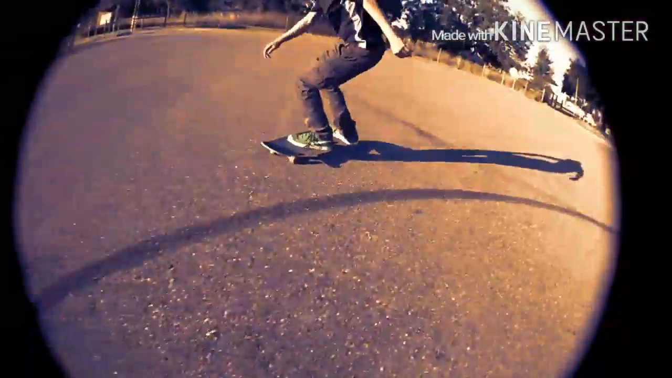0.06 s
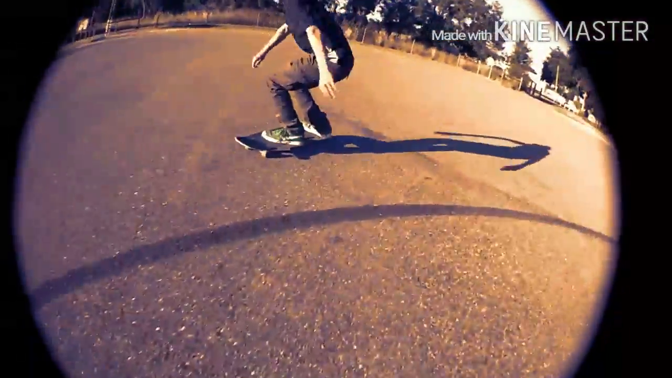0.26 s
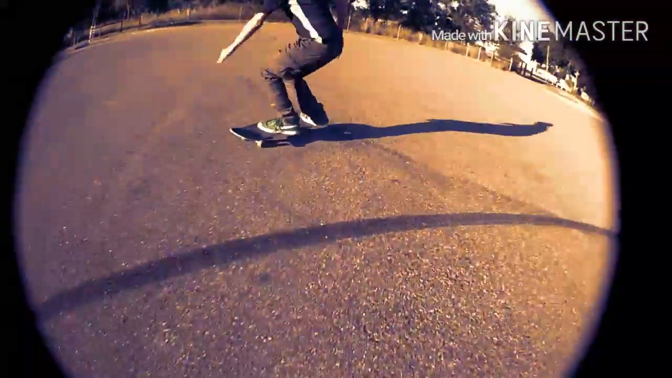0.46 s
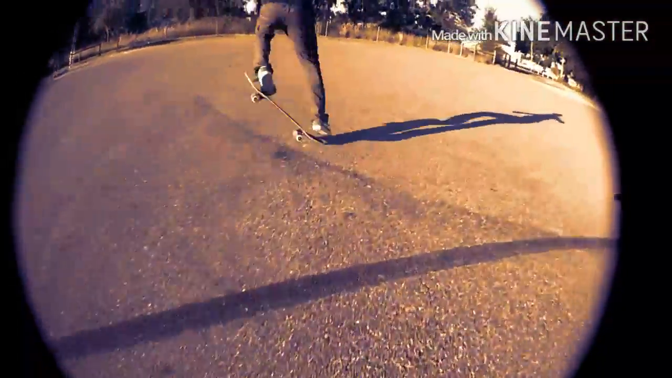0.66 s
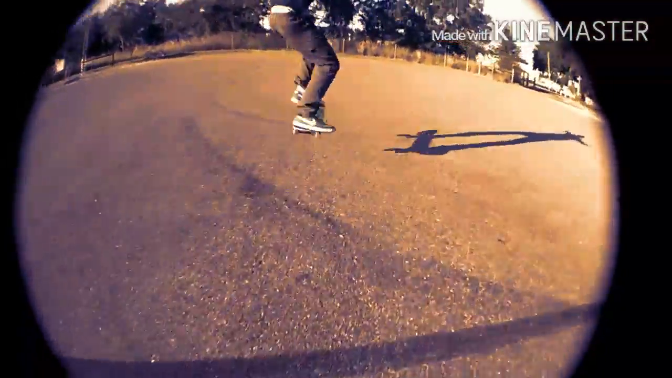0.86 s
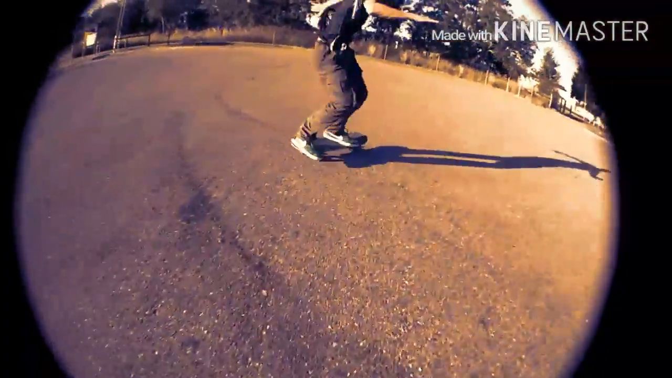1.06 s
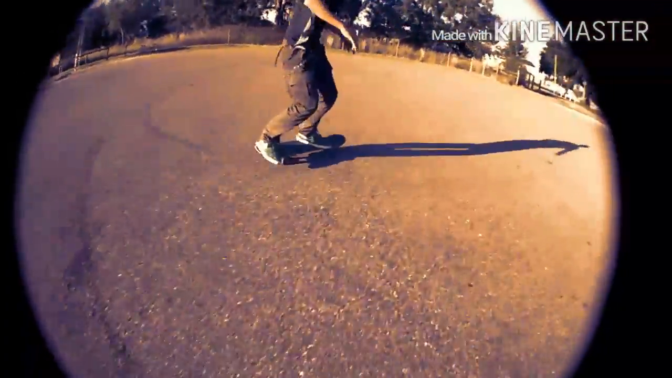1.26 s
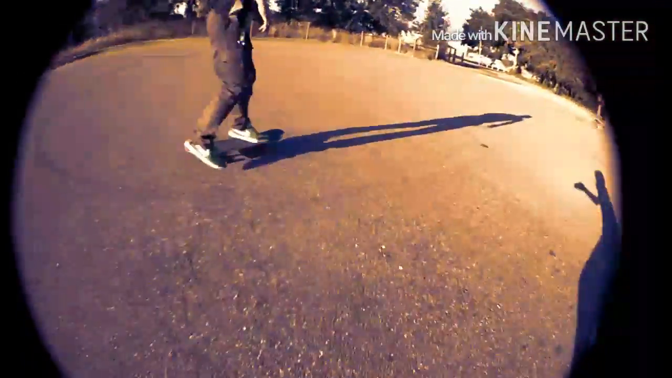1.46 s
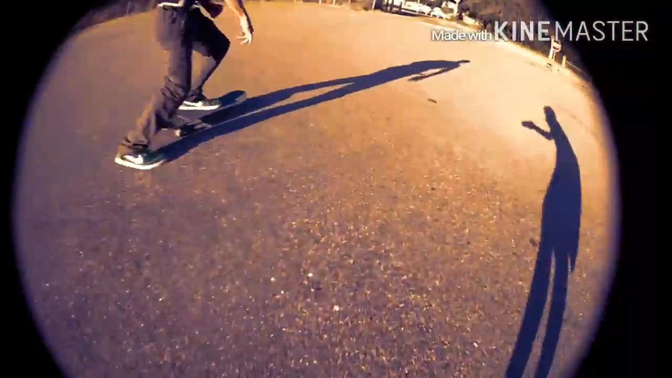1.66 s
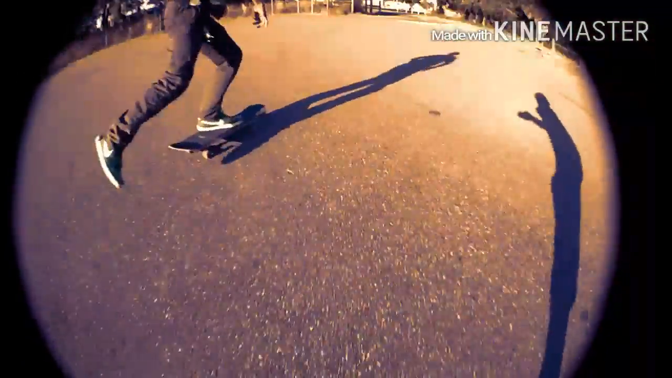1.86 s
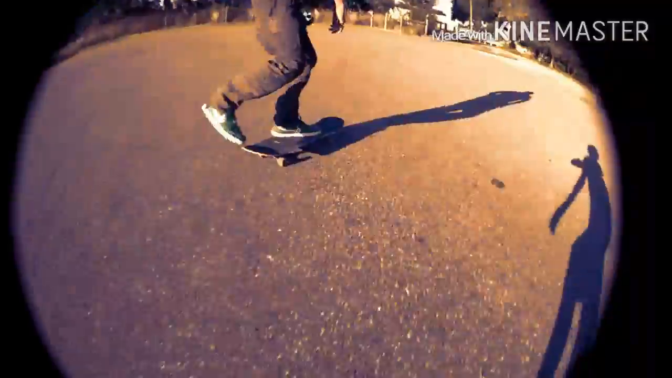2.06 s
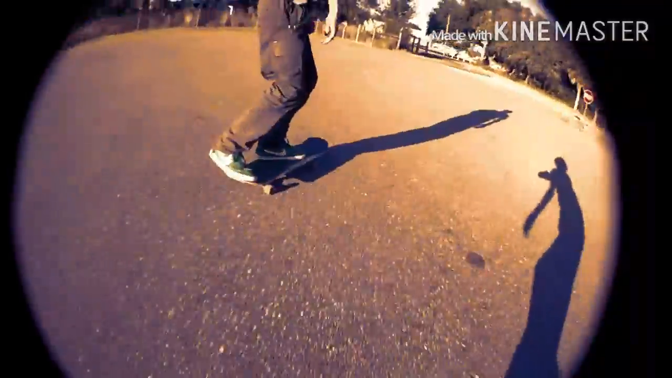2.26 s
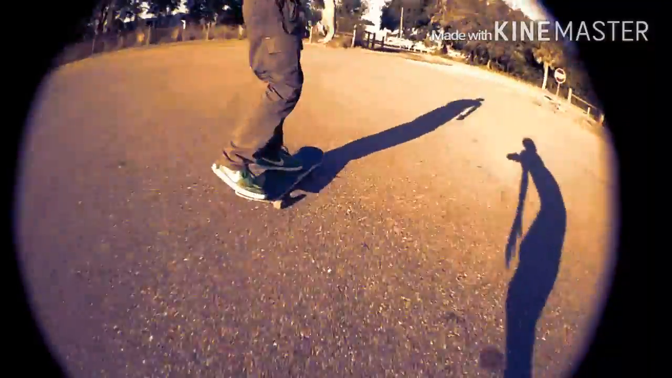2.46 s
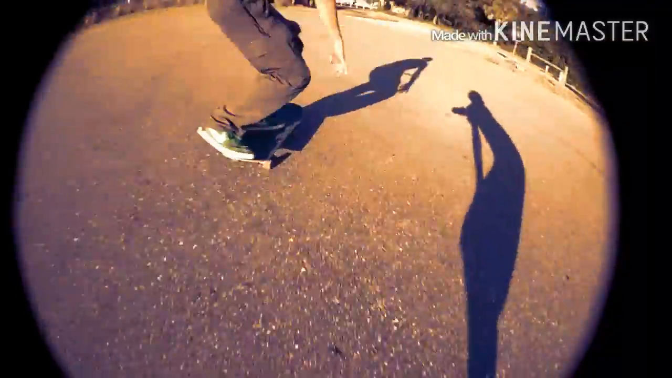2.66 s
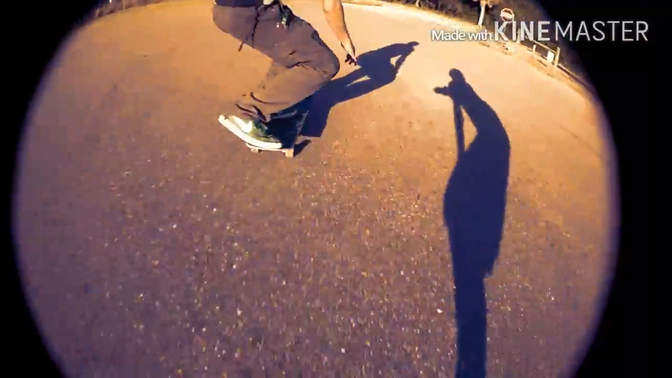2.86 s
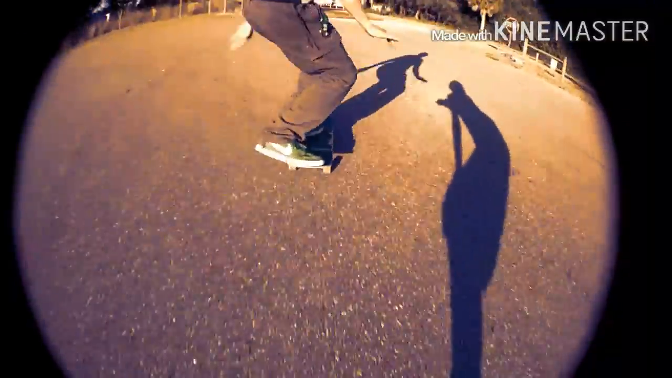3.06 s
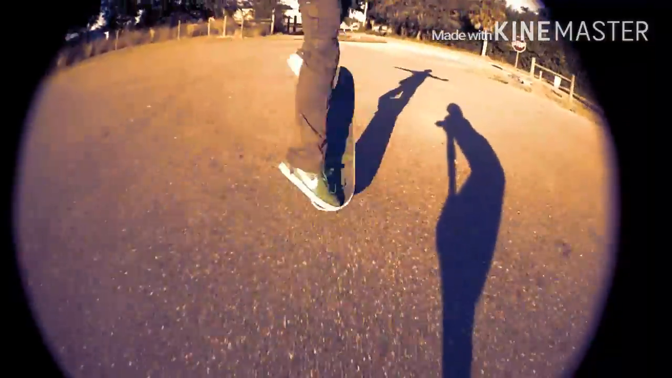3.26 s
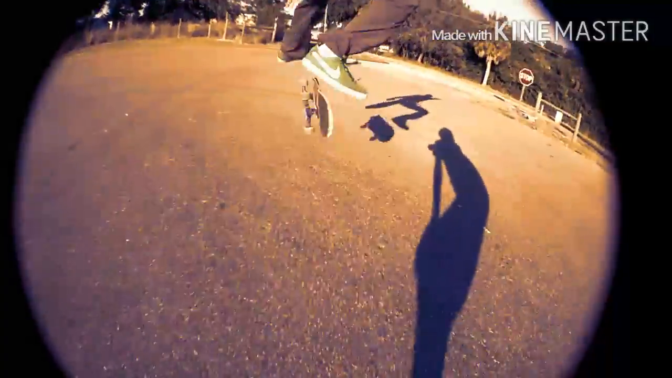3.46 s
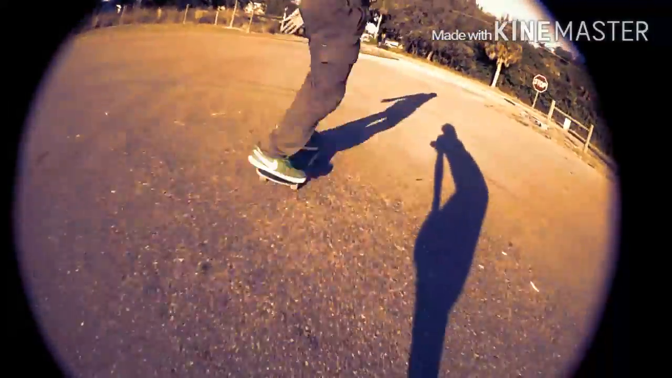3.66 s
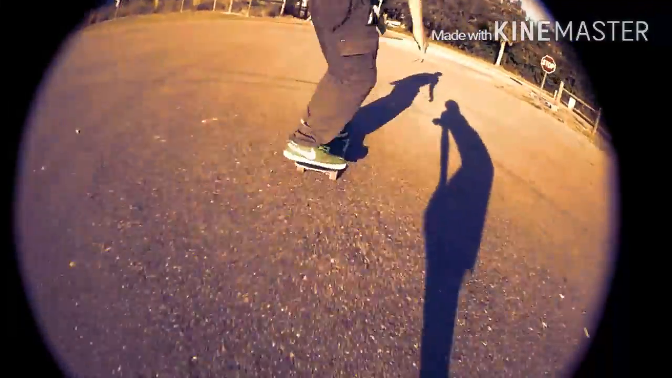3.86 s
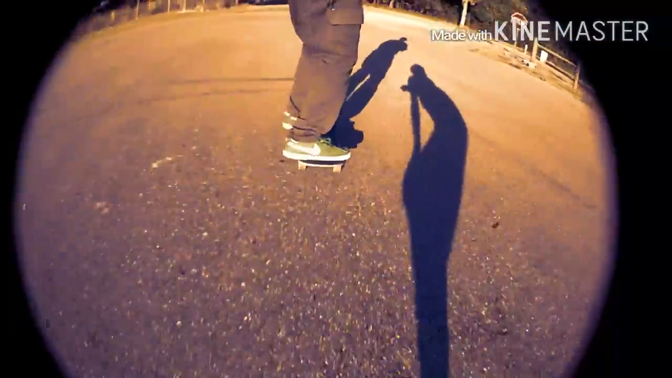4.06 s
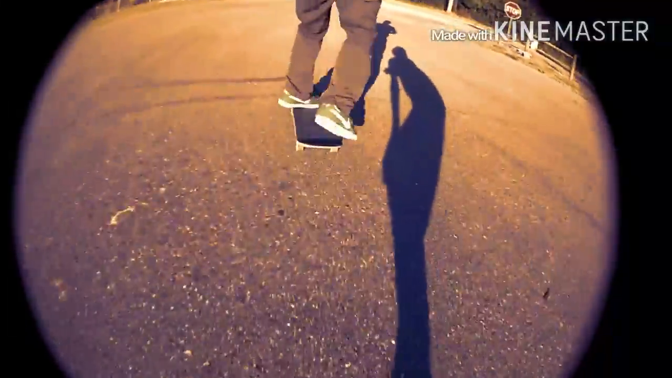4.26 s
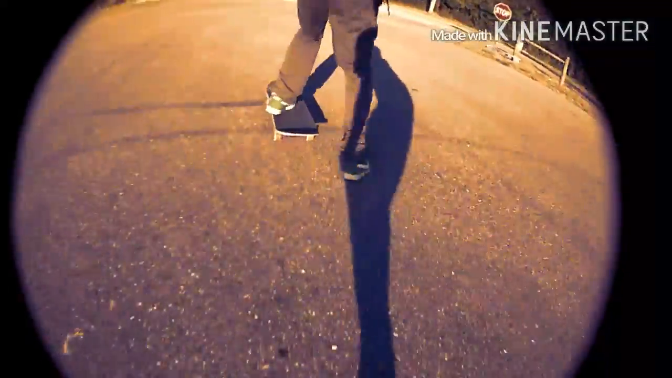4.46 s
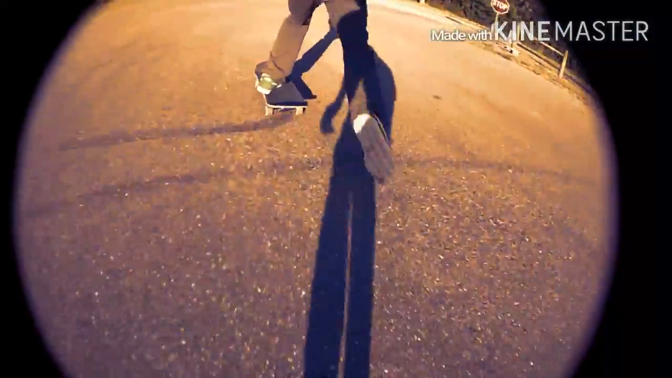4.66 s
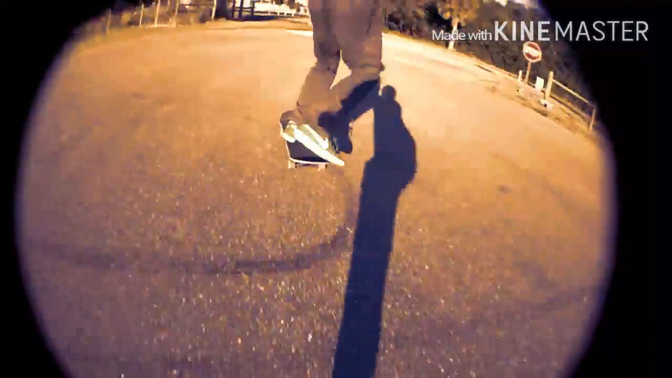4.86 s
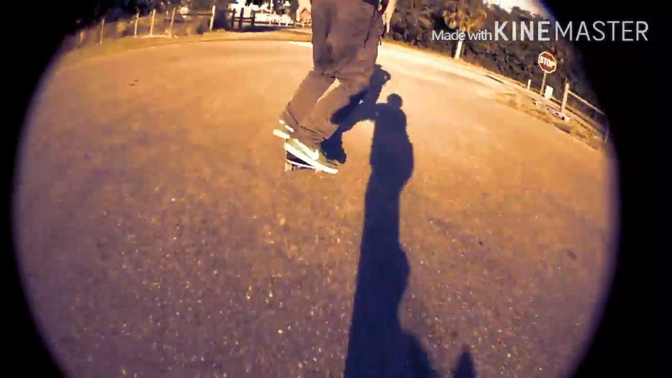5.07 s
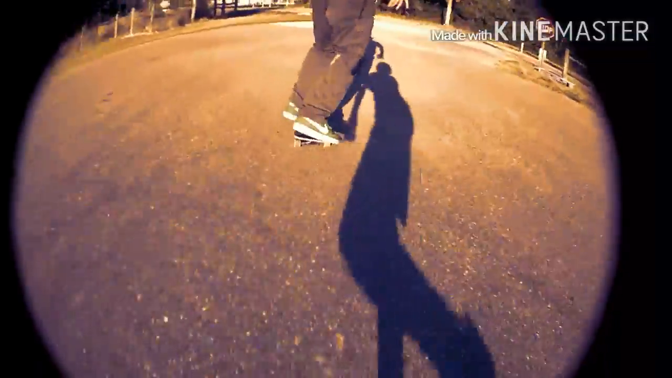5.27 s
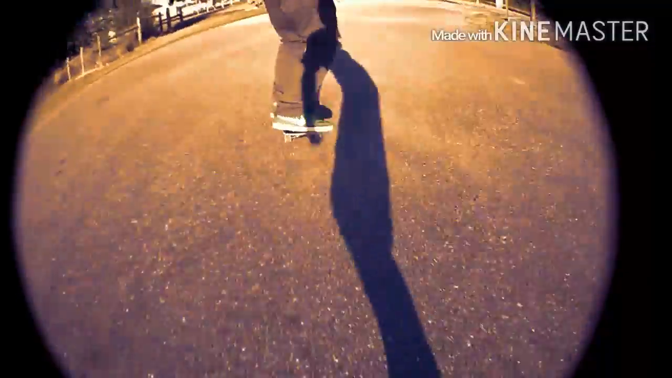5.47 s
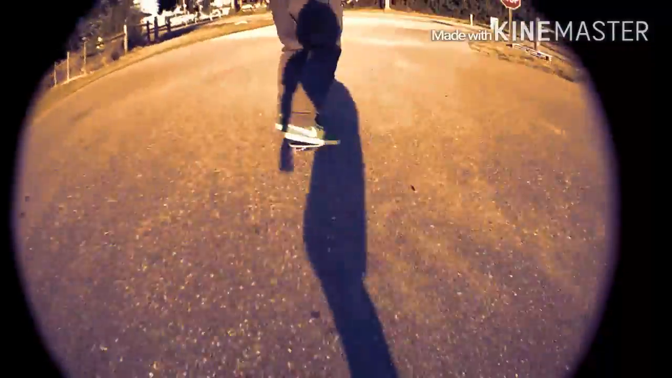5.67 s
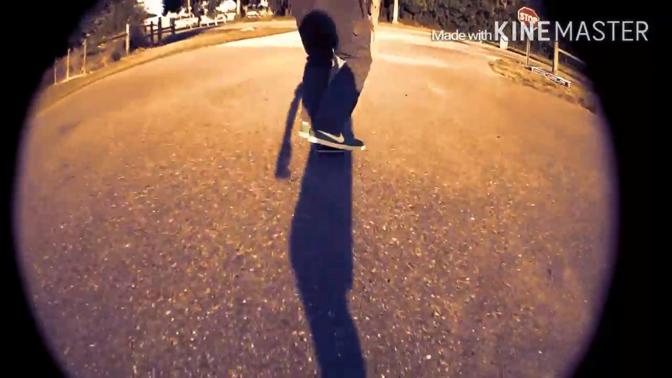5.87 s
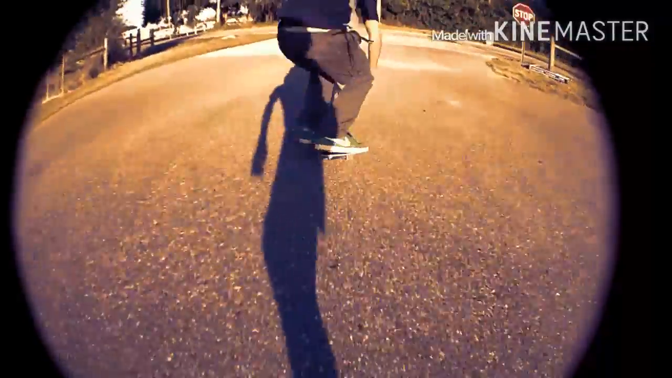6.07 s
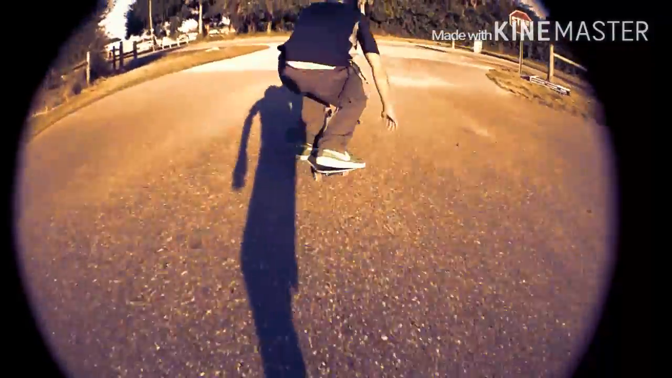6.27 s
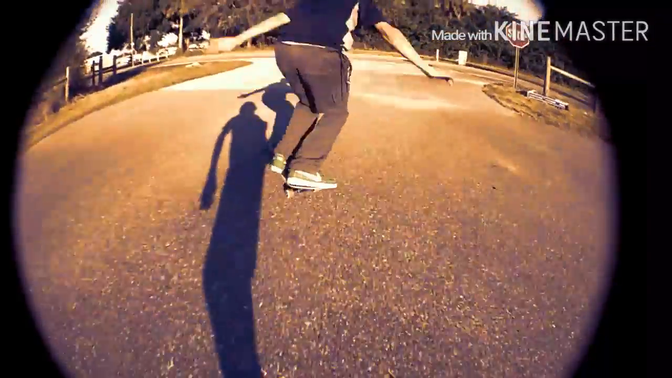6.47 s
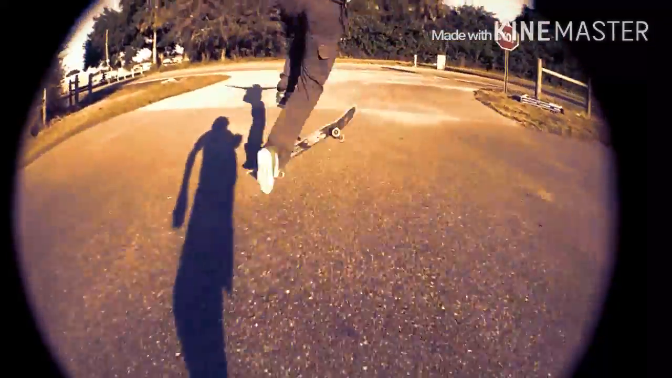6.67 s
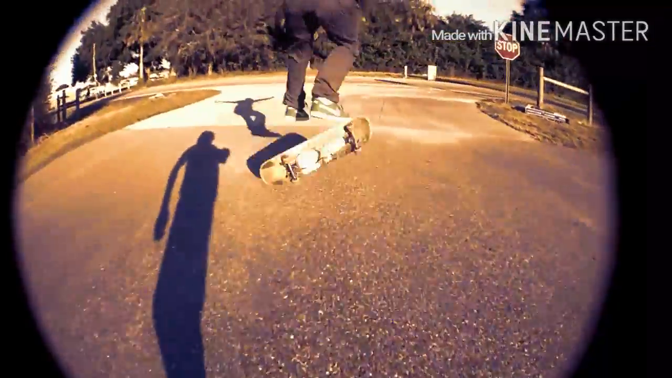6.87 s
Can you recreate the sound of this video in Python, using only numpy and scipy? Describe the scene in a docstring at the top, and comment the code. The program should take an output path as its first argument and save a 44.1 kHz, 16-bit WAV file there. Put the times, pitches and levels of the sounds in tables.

```python
"""A skateboard rolls on coarse asphalt past a first burst of knocks; gusts then blow on two microphones. Shoes
and wheels drag, a second board under the microphones comes up, and tricks bring the hardest blows. Loose trucks
tick as the rolling thins; gusts return, air thumps twice, and a last run of knocks ends it. Stones drive noise
through deck, truck and grit filters throughout, with bright snaps between. Blows ring resonances, the wind
sounds in opposite polarity on the two sides, and the loudest peaks saturate the input."""
import sys
import numpy as np
from scipy import signal
from scipy.fft import rfft, irfft, next_fast_len
from scipy.io import wavfile
from scipy.ndimage import uniform_filter1d, map_coordinates

SR = 44100
rng = np.random.default_rng(int(sys.argv[2]) if len(sys.argv) > 2 else 0)


def wav_out(sig):
    """Save sig, one row per channel (or a flat mono array), as 16-bit PCM at SR to the path in sys.argv[1]."""
    wavfile.write(sys.argv[1], SR, np.round(np.clip(np.atleast_2d(sig).T, -1, 1) * 32767).astype(np.int16))


def linear_from_db(decibels):
    """Turn decibels (scalar or array-like) into linear amplitude factors; 0 gives 1."""
    return 10 ** (np.asarray(decibels, float) / 20)


N = 305172

# rolling of the ridden board, before unloading: time_s, deck_db, brightness_db (trucks and grit)
ROLLING = [(0, -21, -0.5), (.2, -27, 0.5), (.33, -21, 2), (.46, -18.5, -0.5), (1.01, -29.5, 3),
           (1.38, -24, 2.5), (1.46, -19, 0.5), (1.62, -25.5, 3), (1.72, -16, 0), (1.93, -21, 2),
           (2.02, -23.5, 1), (2.9, -19, 1), (2.94, -28, 6), (3.71, -37.5, 3.5), (4.36, -27.5, 3),
           (4.62, -22, 1.5), (4.84, -18, 4.5), (5.09, -22.5, 6), (5.14, -18.5, 5), (5.37, -24, 0.5),
           (5.78, -20.5, 2.5), (6.27, -19.5, 1.5), (6.4, -16.5, -1), (6.92, -36, 1.5)]
# load leaving the wheels and returning evenly: start_s, drop_db, back_after_s
UNLOADINGS = [(0.45, 11, 0.25), (1.636, 7.5, 0.28), (3.025, 6.5, 0.66), (5.78, 7.5, 1), (6.405, 16, 0.32)]
# grit level over what brightness gives: time_s, added_db
GRIT_LIFT = [(0, 7), (.8, 0.5), (1.8, 1), (3.7, -1), (4.7, -1.5), (5.6, 2), (6.92, 3.5)]
# shoes and wheels dragging sideways: start_s, length_s, gain_db
DRAGS = [(2.116, 0.22, -20), (3.286, 0.13, -30.5), (3.68, 0.071, -35), (3.96, 0.33, -32.5),
         (5.45, 0.308, -27), (6.233, 0.084, -21.5), (6.32, 0.098, -23.5)]
# resonances of the wooden deck: centre_hz, width_hz, level_db
DECK_MODES = [(247, 220, -3.5), (520, 172, 2), (664, 135, 4), (903, 202, 1.5), (1285, 320, -4.5)]
# resonances of the trucks: centre_hz, width_hz, level_db
TRUCK_MODES = [(1520, 475, 1), (1800, 620, 3), (2240, 503, -3.5), (3554, 203, -3.5), (4060, 570, -14)]
# spectrum of crushed grit: frequency_hz, density_db (per Hz)
GRIT_SPECTRUM = [(1500, -31), (3600, 9), (5200, -3), (9300, -4.5), (11500, -7.5), (13000, -17),
                 (15300, -21)]
# knocks of tail, wheels and shoes on the deck: start_s, knock_peak_db, crack_peak_db, pitch_hz
BLOWS = [(0.4174, -4, -7.5, 1240), (0.613, -8, -24, 1420), (0.616, -7.5, -25, 1410), (0.63, -9, -10, 800),
         (0.639, -6, -8, 780), (0.717, -3, -5, 2000), (0.733, -5.5, -9, 890), (0.741, -7.5, -16, 1910),
         (0.755, -19, -13, 1800), (0.777, -22, -19, 1700), (1.6987, -8, -20, 990), (1.849, -6, -21, 850),
         (2.968, -9, -28, 1200), (3.0191, -2.5, 2, 990), (3.309, -12.5, -15, 890), (3.317, -24, -11, 1690),
         (3.4286, 5.5, -0.5, 1120), (3.436, 3.5, -3.5, 1800), (3.445, -4, -23, 1830),
         (3.4569, -7, -14, 1400), (3.473, -7, -17, 1700), (4.203, -12, -19, 1520), (6.389, -5, 0.5, 1870),
         (6.7246, -12.5, -6.5, 1100), (6.769, -5, 0, 1010), (6.774, 0.5, -9, 920), (6.786, -5, -3.5, 1520),
         (6.798, -0.5, -1.5, 1040), (6.81, -7.5, -6, 900)]
# resonances of a knocked board: centre_hz, width_hz, level_db
KNOCK_MODES = [(300, 170, 16), (660, 650, 4.5), (1023, 151, 12.5), (1240, 420, 6.5), (1547, 132, 10),
               (1830, 176, 8.5), (2420, 1460, -1.5)]
# resonances of the crack of a blow: centre_hz, width_hz, level_db
CRACK_MODES = [(3670, 550, 19), (9900, 1800, 3.2)]
# loose trucks ticking: start_s, peak_db
TICKS = [(3.378, -16.5), (3.389, -27), (3.462, -14), (3.722, -15), (4.112, -15), (4.139, -14), (4.150, -22),
         (4.163, -10), (4.177, -9), (4.218, -14), (4.228, -15), (4.260, -11), (4.845, -7.5), (4.872, -4.5),
         (4.932, -10)]
# small stones snapping out from under a wheel: start_s, force_db
STONES = [(0.299, -2.5), (1.799, 0), (2.7785, 0), (2.91, 10), (4.83, 0.5), (5.025, 3.5), (5.253, 3.5),
          (5.78, 7), (5.895, -4.5), (5.9377, 2.5)]
# rolling of the second board: time_s, level_db
FOLLOWER = [(0, -52.5), (2.9, -27), (4.2, -40.5), (6.92, -38)]
# the microphone pair: frequency_hz, likeness (0-1), left_over_right_db
PORTS = [(300, 0.9, -0.5), (1200, 0.97, 1.1), (2540, 1, -1), (2900, 0.87, -1), (4550, 0.7, -0.5),
         (5830, 1, -0.5), (7370, 0.89, -0.5), (8000, 0, -6), (10300, 0.73, -9), (11300, 0.6, -1),
         (14900, 1, 0.5)]
# phase between the ports: frequency_hz, left_lag_turns
PORT_LAG = [(2100, 0), (2600, .15), (3150, .5), (4800, 1), (5200, 1.1), (5900, 1.5), (6700, 1.52),
            (7500, 1.92), (8500, 2), (10400, 2.5), (11800, 3), (12900, 3.05), (13400, 3.5), (14400, 3.5),
            (14900, 4)]
# wind on the ports: time_s, strength_db
WIND = [(0, -35), (.78, -17), (.84, -25.5), (2.05, -26.5), (2.15, -34), (2.5, -28), (3.6, -48), (4.0, -37),
        (4.4, -36.5), (4.47, -21.5), (4.8, -27.5), (5.45, -19.5), (5.53, -35.5), (5.7, -28.5),
        (6.25, -19.5), (6.42, -25), (6.92, -28.5)]
# balance of the wind: time_s, deep_over_upper_db, left_over_right_db
WIND_BALANCE = [(0, 12, 1), (.8, -7, 4), (2.1, 6.5, 1), (3.6, -2, -3.5), (5.9, -1, 0), (6.2, -23, -4.5)]
# spectrum of the buffeting: frequency_hz, density_db (per Hz)
BUFFET_SPECTRUM = [(10, -40), (30, -12.5), (60, -9), (120, 2), (220, -1), (350, -7), (600, -16),
                   (1200, -66)]
# dull thumps of air on the ports: centre_s, peak_db, pitch_hz
AIR_THUMPS = [(5.376, -7, 100), (5.443, -11, 118)]

TRUCKS_DB, GRIT_DB = -8.5, -13.5  # relative to the deck
GRIT_GROWS = 1.05  # grit dB per dB of brightness
DECK_SHARE, UNLOAD_S = 0.87, 0.021  # part of a load drop the deck takes; time to unload
RISE_SHARE, STOP_S = 0.3, 0.017  # swell as part of a drag; its stop
PATCH_DB = 2  # rms depth of the time-frequency patches
TOP_HZ = 15700


def unit(x):
    """Scaled to rms 1."""
    return x / np.sqrt(np.mean(x ** 2) + 1e-20)


def curves(rows):
    """One value per sample for each column after the time."""
    time_s, *columns = np.transpose(rows)
    return [np.interp(np.arange(N) / SR, time_s, column) for column in columns]


def wobble(rate_hz):
    """A smooth random curve through rate_hz knots a second."""
    knots = rng.standard_normal(int(N * rate_hz / SR) + 4)
    return map_coordinates(knots, [np.arange(N) * rate_hz / SR])


def filtered(x, response):
    """x times a complex response of frequency."""
    size = next_fast_len(N + 8192)
    spectrum = rfft(x, size) * response(np.fft.rfftfreq(size, 1 / SR))
    return irfft(spectrum, size)[..., :N]


def colour(points):
    """Gain of (Hz, dB) points on a log axis."""
    hz, db = np.transpose(points)
    return lambda f: linear_from_db(np.interp(np.log(f + 1), np.log(hz), db))


def modes(rows):
    """Causal response of a sum of resonances of alternating sign."""
    def response(f):
        return sum((-1) ** k * linear_from_db(db) * 1j * f * width / (centre ** 2 - f * f + 1j * f * width)
                   for k, (centre, width, db) in enumerate(rows))
    return response


def shaken(envelope):
    """Two unrelated rough forces under one envelope: the direct and the scattered path."""
    return envelope * rng.standard_normal((2, N))


def rolling():
    """Stones shake the wooden deck, rattle the trucks and crush grit; drags ring the trucks steadily."""
    level_db, bright_db = curves(ROLLING)
    (grit_lift_db,) = curves(GRIT_LIFT)
    lost_db = unloading()
    deck_db = level_db - DECK_SHARE * lost_db
    trucks_db = level_db - lost_db + TRUCKS_DB + bright_db
    grit_db = level_db - lost_db + GRIT_DB + GRIT_GROWS * bright_db + grit_lift_db

    patch_db = wobble(40)  # coarser and smoother stretches of road
    road = bumps(350 * linear_from_db(patch_db), spread_db=3, t60_s=0.022)
    fine = bumps(200 * linear_from_db(6 * patch_db), spread_db=4, t60_s=0.007)
    taps = pebbles(500 * linear_from_db(2 * patch_db), spread_db=4)

    deck = patchy(filtered(shaken(road + 1.4) + 2.8 * taps, modes(DECK_MODES)))
    deck = deck * linear_from_db(deck_db + wobble(11))
    trucks = patchy(filtered(shaken(road + 1.3) + 2.4 * taps, modes(TRUCK_MODES)))
    trucks = trucks * linear_from_db(trucks_db + wobble(23))
    grit = patchy(filtered(shaken(road + fine + 2) + 2 * taps, colour(GRIT_SPECTRUM)))
    grit = grit * linear_from_db(1.6 * wobble(12))
    rubbed = patchy(filtered(shaken(0.39) + 0.34 * taps, modes(TRUCK_MODES)))
    drag = scraping()
    return deck + trucks + rubbed * drag + grit * (linear_from_db(grit_db) + 0.097 * drag)


def unloading():
    """Level lost while the wheels are lifted or lightened, dB."""
    t = np.arange(N) / SR
    return sum(drop_db * np.clip((t - start) / UNLOAD_S, 0, 1) * np.clip(1 - (t - start) / back, 0, 1)
               for start, drop_db, back in UNLOADINGS)


def bumps(rate_hz, spread_db, t60_s):
    """Force envelope of a wheel on asphalt: stones of uneven size, each a jolt that dies fast."""
    struck = rng.random(N) < rate_hz / SR
    jolts = struck * linear_from_db(spread_db * rng.standard_normal(N))
    return unit(signal.lfilter([1], [1, -linear_from_db(-60 / (t60_s * SR))], jolts))


def pebbles(rate_hz, spread_db):
    """Single taps of uneven size, rms 1, with random signs on the direct and the scattered path."""
    struck = rng.random(N) < rate_hz / SR
    size = linear_from_db(spread_db * rng.standard_normal(N))
    return unit(struck * size * np.sign(rng.standard_normal((2, N))))


def patchy(x):
    """Random small patches of time and frequency swell and fade; rms 1."""
    z = signal.stft(x, nperseg=512)[2]
    field = uniform_filter1d(rng.standard_normal(z.shape[1:]), size=3, axis=0)
    field = uniform_filter1d(field, size=5, axis=1)
    return unit(signal.istft(z * linear_from_db(PATCH_DB * unit(field)), nperseg=512)[1][:, :N])


def scraping():
    """Gain envelope of the drags, each swelling in and stopping quickly."""
    t = np.arange(N) / SR
    return sum(linear_from_db(db) * np.clip((t - start) / (RISE_SHARE * span), 0, 1)
               * np.clip((start + span - t) / STOP_S, 0, 1) for start, span, db in DRAGS)


def blows():
    """A sharp strike with chatter rings the modes near its pitch most, cracks and thumps."""
    out, t = np.zeros((2, N + SR)), np.arange(SR // 8) / SR
    size = 2 * len(t)
    f = np.fft.rfftfreq(size, 1 / SR)
    for start_s, db, crack_db, pitch_hz in BLOWS:
        t60_s = 0.039 * linear_from_db(0.13 * db)  # harder blows chatter longer
        fading = linear_from_db(-60 * t / t60_s)
        force = fading * (1 - np.exp(-t / 0.001)) * rng.standard_normal((2, len(t)))
        force[:, 0] = 8, 3  # first contact, direct and scattered
        rung = [(c, width, level - 9 * np.log2(c / pitch_hz) ** 2) for c, width, level in KNOCK_MODES]
        spectrum = rfft(force, size)
        knock = irfft(spectrum * modes(rung)(f))[:, :len(t)]
        crack = irfft(spectrum * modes(CRACK_MODES)(f))[:, :len(t)]
        crack = crack * fading  # the crack is over before the wood stops
        sound = linear_from_db(db) * knock / np.abs(knock[0]).max()
        sound += linear_from_db(crack_db) * crack / np.abs(crack[0]).max()
        thump_db = db + np.array([[-27], [-17]]) - 60 * t / 0.036
        sound += linear_from_db(thump_db) * np.sin(2 * np.pi * 170 * t)
        out[:, round(start_s * SR):][:, :len(t)] += sound
    return out[:, :N]


def ticks():
    """Each tick is a few milliseconds of chatter in the trucks' resonances."""
    out, t = np.zeros((2, N + SR)), np.arange(SR // 20) / SR
    response = modes(TRUCK_MODES[:3])(np.fft.rfftfreq(len(t), 1 / SR)) ** 2
    for start_s, db in TICKS:
        force = linear_from_db(-60 * t / 0.021) * rng.standard_normal((2, len(t)))
        ring = irfft(rfft(force) * response, len(t))
        out[:, round(start_s * SR):][:, :len(t)] += linear_from_db(db) * ring / np.abs(ring[0]).max()
    return out[:, :N]


def stones():
    """Fast-dying noise through two broad resonances: short bright snaps without a ring."""
    envelope, t = np.zeros(N + SR), np.arange(SR // 20) / SR
    for start_s, db in STONES:
        envelope[round(start_s * SR):][:len(t)] += linear_from_db(db - 60 * t / 0.0094)
    return filtered(shaken(envelope[:N]), modes([(9300, 2900, -9.5), (4950, 11000, -21.0)]))


def follower():
    """A second board under the microphones: jolts at an even rate hum in the deck, most at 621 Hz."""
    (level_db,) = curves(FOLLOWER)
    force = shaken(bumps(300, spread_db=1, t60_s=0.057))
    hum = filtered(force, modes([(274, 123, -5.0), (621.0, 44, 3.0), (990, 530, -16.5)]))
    return unit(hum) * linear_from_db(level_db)


def ports(paths):
    """Both ports share the direct path, lagging each other, and take the scattered one in opposition."""
    hz, alike, lean_db = np.transpose(PORTS)
    lag_hz, lag_turns = np.transpose(PORT_LAG)

    def angle(f):
        return np.arccos(np.clip(np.interp(f, hz, alike), 0, 1)) / 2

    def half(f):  # half of the left-right difference
        return linear_from_db(np.interp(f, hz, lean_db) / 2) * np.exp(-1j * np.pi * np.interp(f, lag_hz, lag_turns))

    shared, apart = filtered(paths, lambda f: [np.cos(angle(f)), np.sin(angle(f))])
    return filtered([shared + apart, shared - apart], lambda f: [half(f), 1 / half(f)])


def wind():
    """Lumpy gusts sound in opposite polarity on the two channels, the left one later; air thumps both."""
    (strength_db,) = curves(WIND)
    depth_db, lean_db = curves(WIND_BALANCE)
    noise = filtered(shaken(linear_from_db(1.67 * wobble(18))), colour(BUFFET_SPECTRUM))
    deep = filtered(noise, lambda f: 1 / (1 + (f / 95) ** 4))
    push, stray = linear_from_db(strength_db) * (linear_from_db(depth_db) * unit(deep) + unit(noise - deep))
    late = np.roll(push, shift=12)  # samples
    gusts = np.array([late + 0.27 * stray, -push + 0.11 * stray]) * linear_from_db([lean_db / 2, -lean_db / 2])
    t = np.arange(N) / SR
    thumps = sum(linear_from_db(db) * np.exp(-(hz * (t - centre)) ** 2) * -np.cos(2 * np.pi * hz * (t - centre))
                 for centre, db, hz in AIR_THUMPS)
    return gusts + thumps * [[1], [-.5]]


def scene():
    """Board sounds through the ports, with the wind."""
    return ports(rolling() + follower() + blows() + ticks() + stones()) + wind()


def top_cut(x):
    """Nothing passes above the cut-off."""
    return signal.sosfilt(signal.butter(12, 15690, fs=SR, output="sos"), x)


def record(dry):
    """The input saturates towards full scale, then loses everything above its band limit."""
    clipped = dry / (1 + np.abs(dry) ** 8) ** (1 / 8)
    limited = filtered(clipped, lambda hz: np.clip((TOP_HZ - hz) / 300, 0, 1))
    return top_cut(limited)


dry = scene()
out = record(dry)
wav_out(out)
```